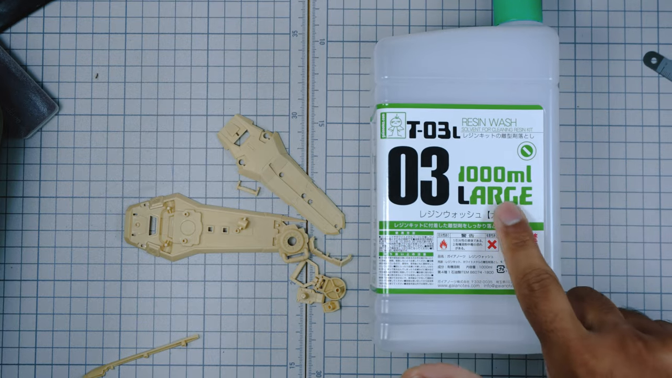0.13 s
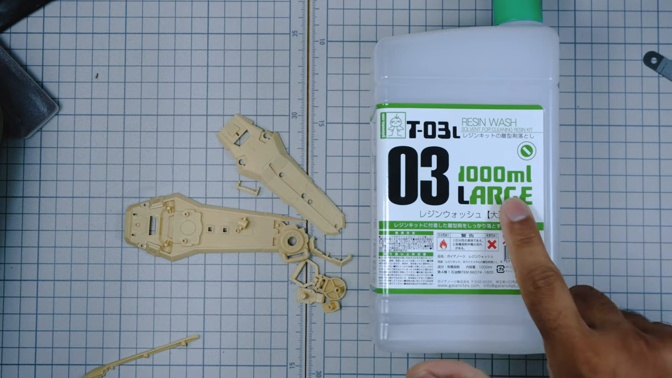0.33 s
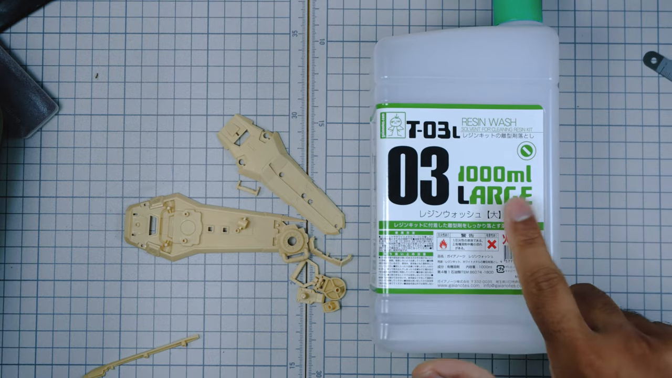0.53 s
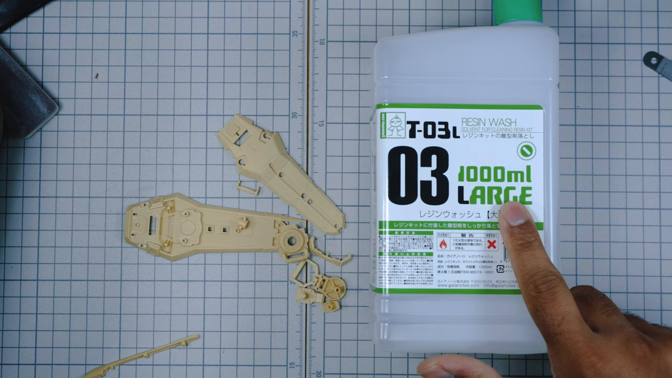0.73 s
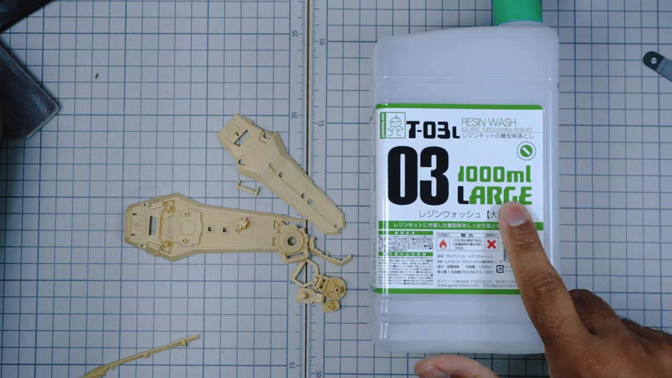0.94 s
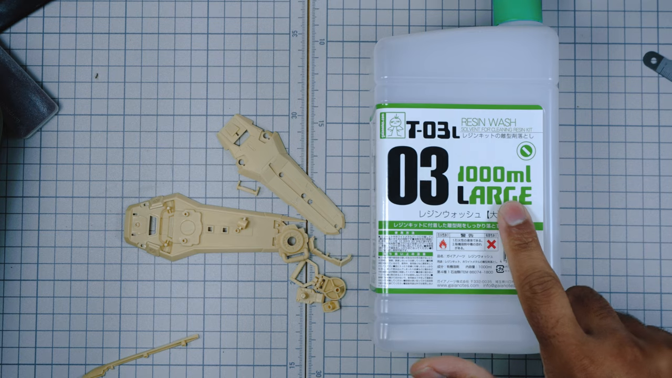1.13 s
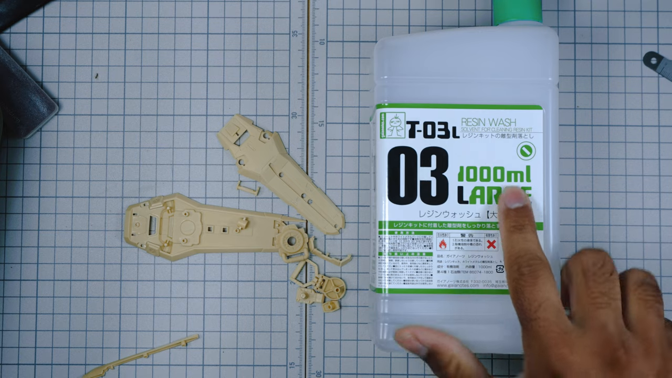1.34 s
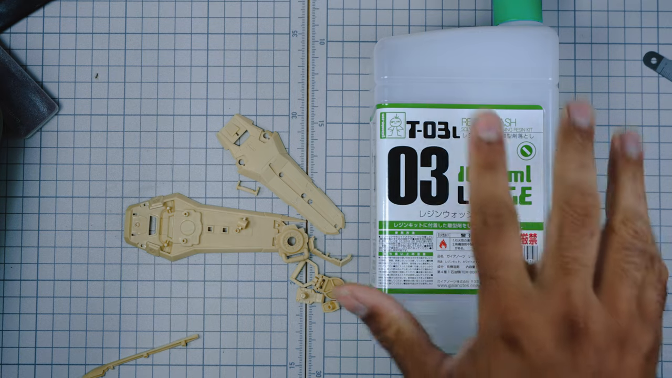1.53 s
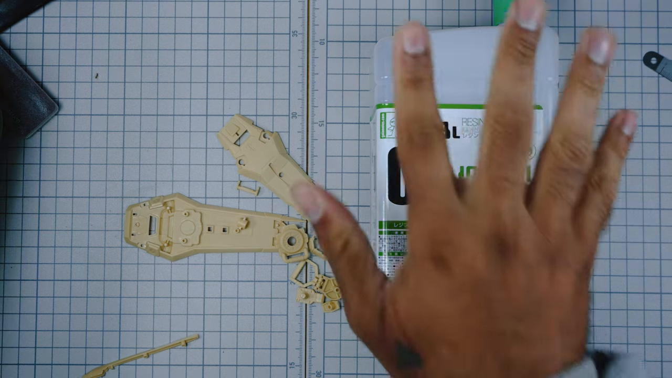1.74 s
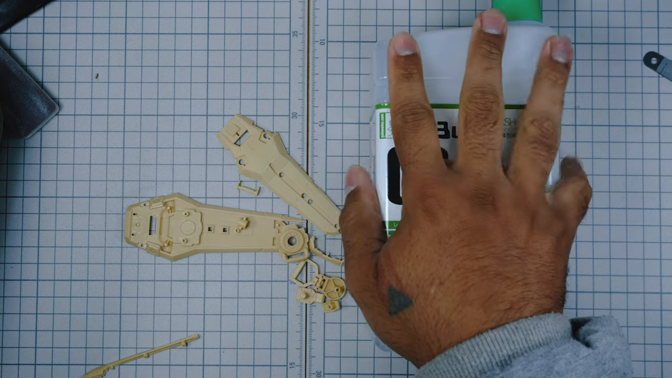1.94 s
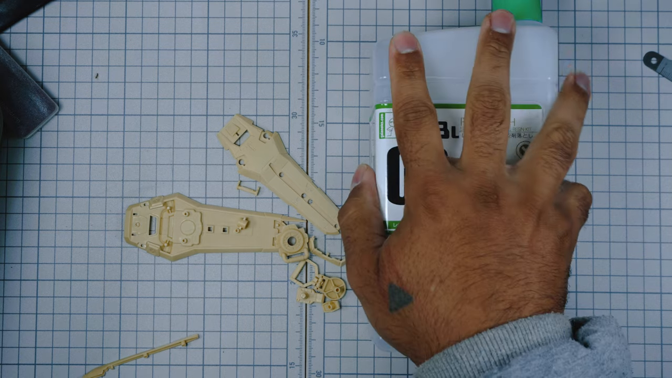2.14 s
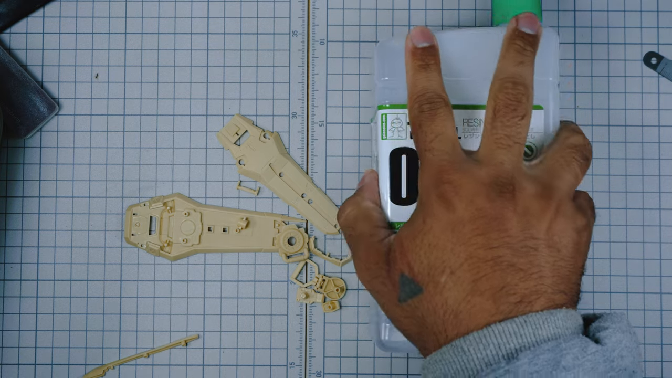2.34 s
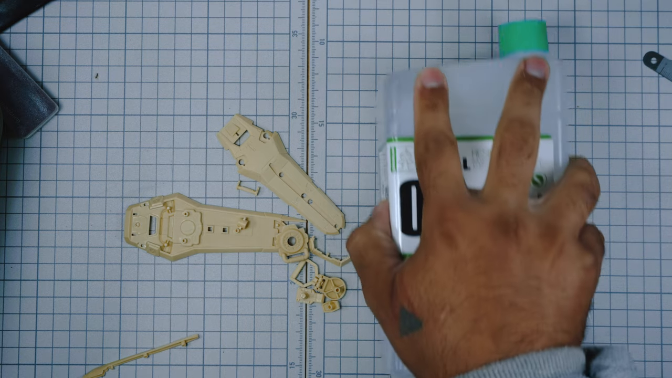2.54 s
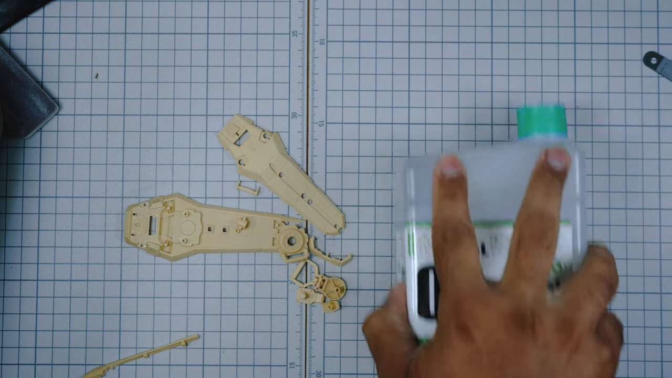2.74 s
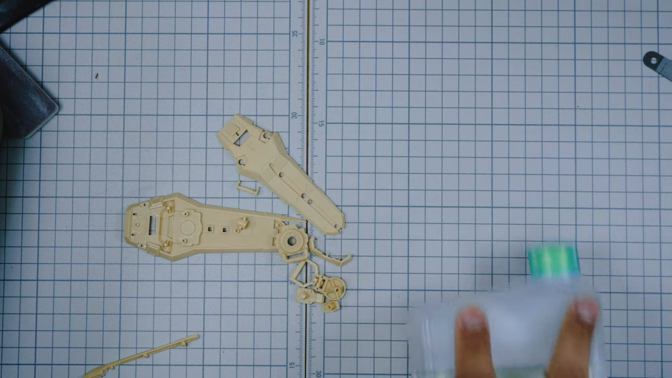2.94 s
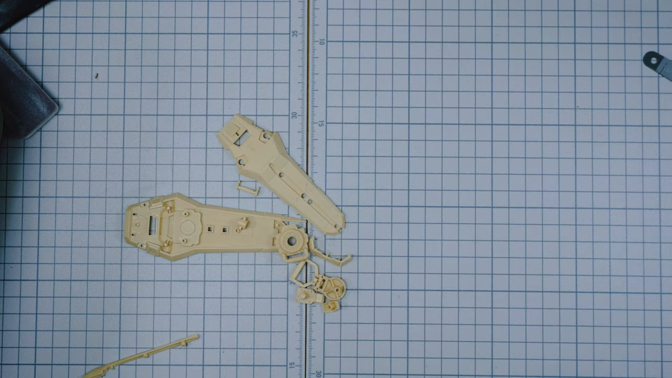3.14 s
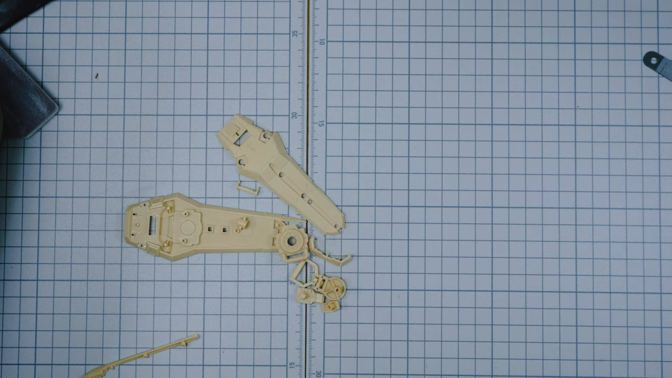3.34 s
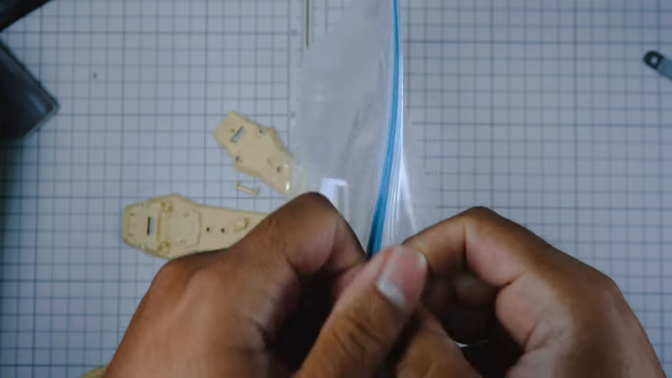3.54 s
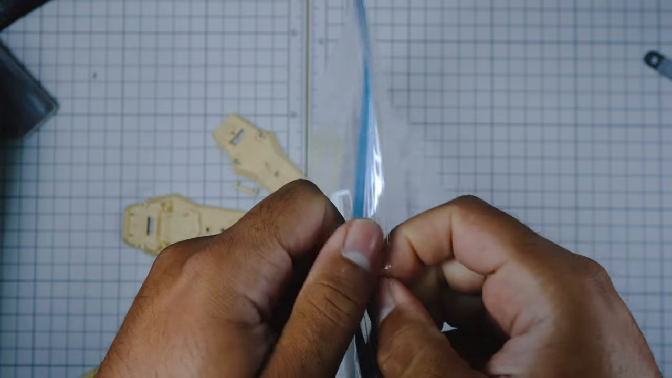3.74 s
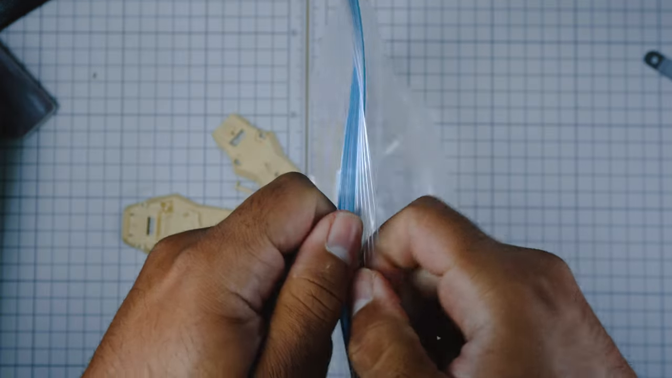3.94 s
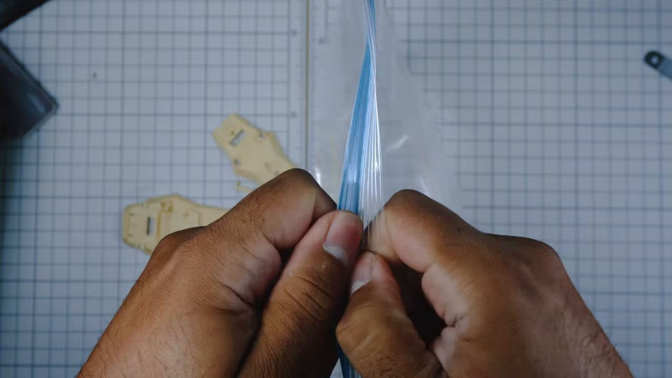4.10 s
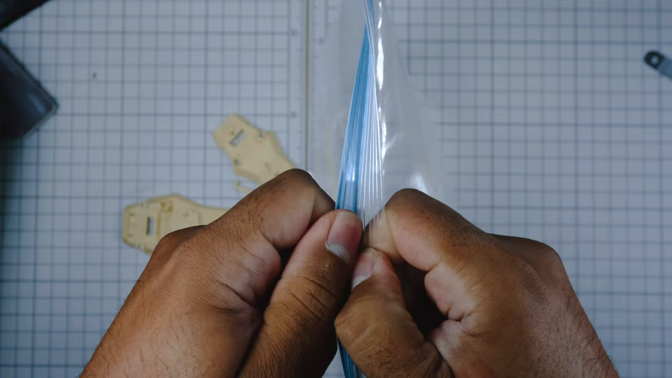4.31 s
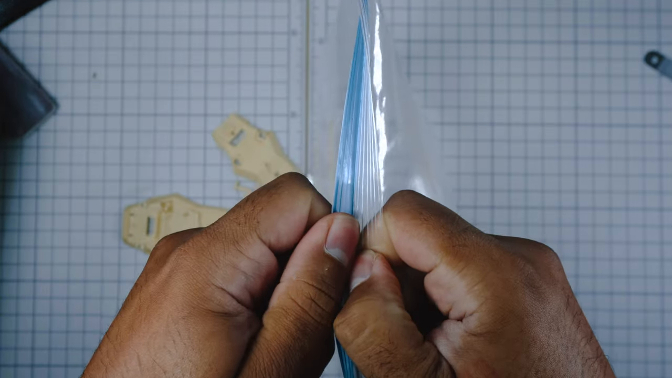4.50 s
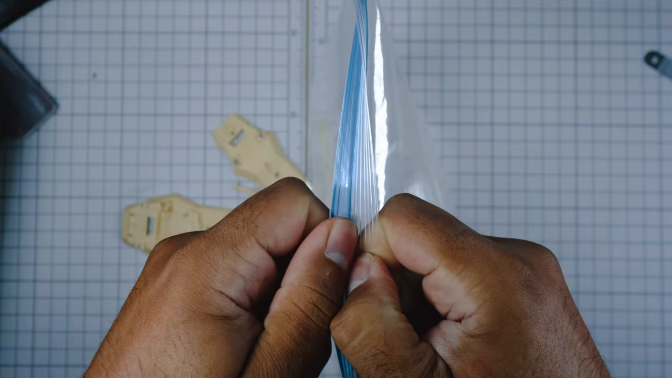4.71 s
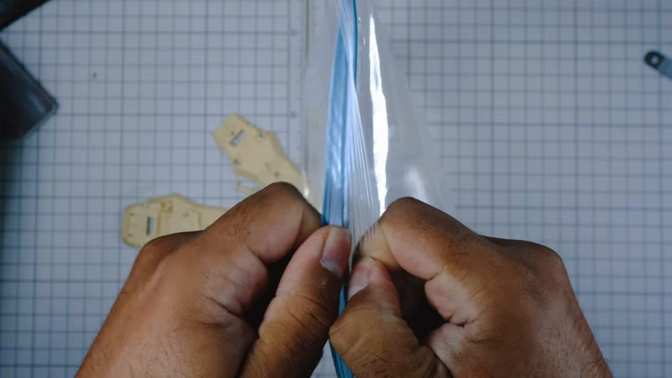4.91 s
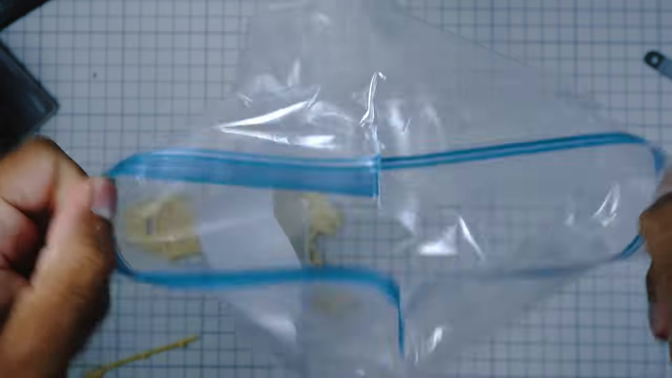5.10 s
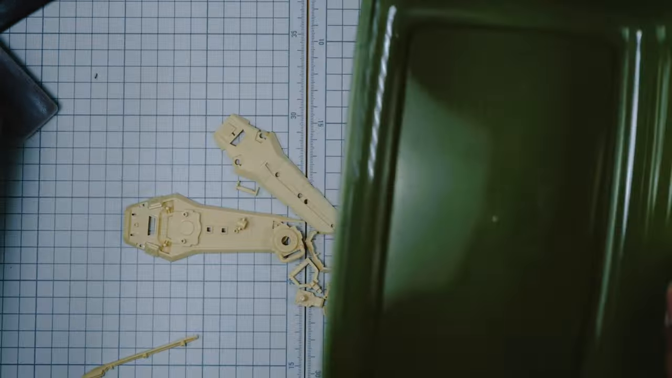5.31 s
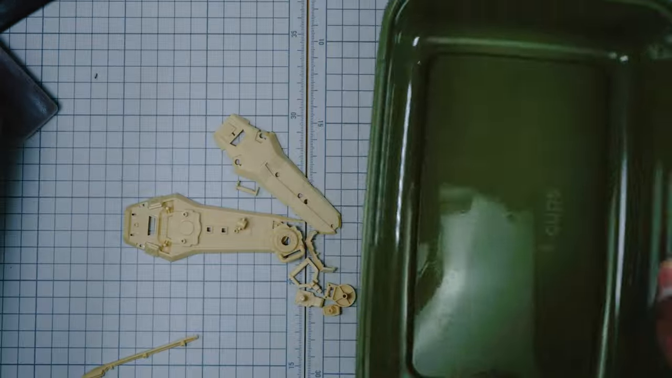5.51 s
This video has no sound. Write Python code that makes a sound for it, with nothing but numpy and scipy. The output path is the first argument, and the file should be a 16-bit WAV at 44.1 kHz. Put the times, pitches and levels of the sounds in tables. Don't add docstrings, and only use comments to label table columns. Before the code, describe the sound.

Four evenly spaced hard nail clicks on a filled bottle, a pause, then a meaty palm slap with soft skin rubbing. The bottle drags with a growing hollow scrape, skips and knocks off the edge. An abrupt cut brings light bag crinkling, near stillness, then a dense crackling rip with hollow pops, by far the loudest event. Quiet fan and low rumble underneath; close microphone indoors.

```python
import sys
import numpy as np
from scipy import signal
from scipy.io import wavfile
from scipy.ndimage import uniform_filter1d

SR = 44100
rng = np.random.default_rng(int(sys.argv[2]) if len(sys.argv) > 2 else 0)


def digitize_waveform(pressure):
    field = np.atleast_2d(pressure).T
    bounded = np.clip(field, -1, 1)
    quanta = np.round(bounded * 32767).astype(np.int16)
    wavfile.write(sys.argv[1], SR, quanta)


def how_loud(loudness_db):
    steps = np.asarray(loudness_db, float) / 20
    return 10 ** steps


N = 245195
T = np.arange(N) / SR


def evened(x):
    return x / np.sqrt(np.mean(x ** 2) + 1e-20)


def read(points, hz):
    f, value = np.transpose(points)
    return np.interp(np.log(hz + 1), np.log(f + 1), value)


def add(mix, s, sound):
    part = mix[round(s * SR):][:len(sound)]
    part += sound[:len(part)]


def resonate(x, hz, width):
    r = np.exp(-np.pi * width / SR)
    return 2 * signal.lfilter([1 - r], [1, -r * np.exp(2j * np.pi * hz / SR)], x).real


def ring(modes, spread_db):
    t = T[:SR // 2]
    out = np.zeros(len(t))
    for hz, db, t60 in modes:
        fall_db = db + spread_db * rng.standard_normal() - 60 * t / t60
        out += how_loud(fall_db) * np.sin(2 * np.pi * hz * t)
    return out


def burst(length, rise=1e-5):
    t = T[:3500]
    return rng.standard_normal(len(t)) * np.exp(-t / length) * (1 - np.exp(-(t + 1 / SR) / rise))


def snap(db, hz, fizz_db, length, width, click=0., rise=1e-5):
    kick = burst(length, rise)
    kick[0] += click
    body = resonate(kick, hz, width) + 0.14 * resonate(kick, 1600, 1100) + 0.16 * resonate(kick, 3500, 1700)
    top_hz = np.clip(2.4 * hz, 6000, 20000)
    body = signal.lfilter(*signal.butter(2, [600, top_hz], "bandpass", fs=SR), body)
    flash = burst(length, rise)
    flash[0] += click
    spark = resonate(resonate(flash, 11000, 9300), 11000, 9300)
    return how_loud(db) * (body / abs(body).max() + how_loud(fizz_db - 1.5) * spark / abs(spark).max())


def crinkle(db, hz, fizz_db, ms):
    return snap(db + 2.5, hz, fizz_db + 1.0, 0.00091 * ms, 470)


def crinkles(events):
    out = np.zeros(N)
    for s, *event in events:
        add(out, s, crinkle(*event))
    return out


def hollow_knocks(events):
    out = np.zeros(N)
    for s, db, hz, t60 in events:
        add(out, s, np.convolve(ring([(hz, db, t60)], 0), np.hanning(16) / 8))
    return out


def friction(rows, colour, centres_hz, grit_db, patch_db, size, rings=()):
    s, main_db, *others_db = np.transpose(rows)
    t = np.arange(s[0], s[-1], 1 / SR)
    grit = evened(uniform_filter1d(rng.standard_normal(len(t)), size=40))
    slips = rng.standard_normal(len(t)) * how_loud(grit_db * grit)
    slips = slips + sum(how_loud(db) * resonate(slips, hz, width) for hz, width, db in rings)
    hz, when, z = signal.stft(slips, SR, nperseg=512, noverlap=448)
    patches = uniform_filter1d(rng.standard_normal(z.shape), size[0], axis=0)
    patches = uniform_filter1d(patches, size[1], axis=1)
    z = z * how_loud(read(colour, hz)[:, None] + patch_db * evened(patches))
    out, order = 0, np.argsort(centres_hz)
    centres = np.log(np.array(centres_hz)[order])
    for k, db in enumerate([main_db] + [main_db + other for other in others_db]):
        share = np.interp(np.log(hz + 1), centres, order == k)
        band = signal.istft(z * share[:, None], SR, nperseg=512, noverlap=448)[1][:len(t)]
        out = out + evened(band) * how_loud(np.interp(t, s, db))
    return s[0], out * signal.windows.tukey(len(t), 0.0073 / (s[-1] - s[0]))


def stroke(curve, grip):
    return [(s, db, *grip) for s, db in curve]


def per_shot(levels_db):
    return how_loud(levels_db)[np.searchsorted([cut[0] for cut in CUTS], T)]


# time_s, turns_made
TURNS = [(.075, 1), (.807, 13), (1.226, 20), (1.712, 28), (3.437, 56.5), (4.284, 70), (4.891, 80),
         (5.308, 87), (5.61, 92)]


def fan_turns():
    return np.interp(T, *np.transpose([(-.535, -9)] + TURNS))


# time_s, sway_db
SWAY = [(0, -47), (.17, -44.5), (.34, -38), (.62, -36.5), (.96, -40), (1.21, -49), (1.52, -45),
        (1.84, -54.5), (2.21, -41.5), (2.38, -50.5), (2.66, -46), (2.97, -56.5), (3.22, -49.5),
        (3.5, -56.5), (4.33, -53.5), (4.63, -60.5), (5.31, -54.5), (5.56, -53)]


def fan_sway(turns):
    once = how_loud(np.interp(T, *np.transpose(SWAY)))
    twice = how_loud(-66.5) * np.sin(4 * np.pi * turns + 0.67)
    return np.sqrt(2) * (once * np.sin(2 * np.pi * turns + 4.3) + twice)


# pitch_hz, level_db (rms)
HUM = [(59.5, -59.5), (118.8, -66), (228, -70)]


def fan_hum():
    out = np.zeros(N)
    for hz, db in HUM:
        wobble = evened(resonate(rng.standard_normal(N), hz, 2.1))
        out += how_loud(db) * (np.sin(2 * np.pi * hz * T) + 0.55 * wobble)
    return np.sqrt(2) * out


TICK_DB = [-67.5, -76.5, -75]


def fan_ticks(turns):
    ticks = np.diff(np.floor(turns), prepend=0) * how_loud(1.9 * rng.standard_normal(N))
    return per_shot(TICK_DB) * signal.oaconvolve(ticks, np.diff(burst(0.0012)))[:N]


# pitch_hz, width_hz, level_db
WHINE = (6230, 300, -85.5)
WHINE_TRIM_DB = [0.5, -3, -6]


def fan_whine():
    hz, width, db = WHINE
    whine = resonate(resonate(rng.standard_normal(N), hz, width), hz, width)
    return per_shot(db + np.array(WHINE_TRIM_DB)) * evened(whine)


# pitch_hz, level_db (per Hz)
AIR = [(24, -10.5), (40, -0.5), (186, -15.5), (228, -14.5), (316, -15), (367, -27.5), (438, -28),
       (550, -35), (608, -31.5), (1580, -45), (5440, -52.5), (6330, -54.5), (7180, -58), (15300, -62),
       (16500, -65)]
RUMBLE_DB = [-56, -60.5, -59]


def fan_air():
    hz, t, z = signal.stft(rng.standard_normal(N), SR, nperseg=2048)
    z = z * how_loud(read(AIR, hz))[:, None]
    low = np.interp(hz, [300, 500], [1, 0])[:, None]
    hiss = signal.istft(z * (1 - low), SR, nperseg=2048)[1][:N]
    rumble = signal.istft(z * low, SR, nperseg=2048)[1][:N]
    return how_loud(-68) * evened(hiss) + how_loud(3.0) * per_shot(RUMBLE_DB) * evened(rumble)


def fan():
    turns = fan_turns()
    return fan_sway(turns) + fan_hum() + fan_ticks(turns) + fan_whine() + fan_air()


# pitch_hz, level_db, t60_s
TAP_MODES = [(75, -6.5, 0.19), (131, -9.5, 0.083), (197, -6.5, 0.056), (254, -6, 0.027), (425, -2.5, 0.067),
             (506, -16, 0.16), (572, -9, 0.0936), (750, -6.5, 0.049), (985, -12.5, 0.02),
             (1280, 0.5, 0.019), (1608, 0, 0.02), (1926, -1, 0.014), (2380, 11, 0.0043),
             (3400, -13, 0.0056), (4300, -2.5, 0.0065)]


def tap(db, desk_db):
    click = 0.11 * resonate(burst(0.005), 4900, 4200)
    click[:40] += 0.83 * np.diff(np.exp(-T[:40] / 0.000058), prepend=0)
    click += how_loud(-22.5) * resonate(resonate(burst(0.015), 1500, 2600), 1800, 2600)
    wall = np.convolve(ring(TAP_MODES[4:], 0.29), np.hanning(6) / 3)[:SR // 2]
    thump = ring(TAP_MODES[2:4], 0.6)
    add(thump, 0.0055, ring(TAP_MODES[:2], 0.67))
    desk = how_loud(desk_db) * np.convolve(thump, -np.hanning(70) / 32)[:SR // 2]
    sound = 0.37 * wall + desk
    add(sound, 0, click)
    return how_loud(db) * sound


# start_s, peak_db, desk_db (share of the thump)
TAPS = [
    (0.1324, -31.5, -5),
    (0.3185, -25.5, -5.5),
    (0.506, -26.5, -4),
    (0.6911, -26, -2),
    (1.245, -51, -24),
    (5.107, -43, 15),
]


def taps():
    out = np.zeros(N)
    for s, *blow in TAPS:
        add(out, s, tap(*blow))
    return out


# start_s, peak_db, pitch_hz, fizz_db (re ring), length_ms
BOUNCES = [
    (0.193, -53.5, 900, -20, 2),
    (0.193, -64, 3300, -14, 1.5),
    (0.38, -55.5, 2400, -16, 2),
    (0.56, -62, 2500, -22, 2.8),
]


def bounces():
    return crinkles(BOUNCES)


# time_s, brush_db
BRUSH = [
    [(.51, -82), (.555, -81), (.565, -76), (.6, -80), (.67, -88)],
    [(1.2, -98), (1.224, -82), (1.434, -68.5), (1.55, -84)],
    [(1.74, -80), (1.82, -65), (1.89, -60), (1.896, -64), (1.905, -53)],
    [(1.92, -55), (1.946, -56), (2.06, -75.5)],
    [(2.05, -77), (2.16, -73.5), (2.26, -68), (2.318, -77), (2.44, -74), (2.5, -74)],
]
# squeak_db, fizz_db (re brush)
BRUSH_GRIP = [(10.5, 4), (5.5, 2), (-1.5, -11), (1.5, -6), (11.5, -1)]
# pitch_hz, level_db (per Hz)
BRUSH_COLOUR = [(410, 20), (700, -38), (936, 6.5), (1530, 6.5), (1740, -1), (2100, -10.5), (3160, -9.5),
                (5800, -19), (11200, -29), (15400, -31), (16500, -26)]
# pitch_hz, width_hz, level_db (over the brush)
SQUEAK = [(1780, 140, 13)]


def brushes():
    out = np.zeros(N)
    for curve, grip in zip(BRUSH, BRUSH_GRIP):
        add(out, *friction(stroke(curve, grip), BRUSH_COLOUR, [3800, 1750, 10000], 1.0, 3.3,
                           size=(8, 12), rings=SQUEAK))
    return out


# pitch_hz, level_db, t60_s
SLAP_MODES = [(108.7, -10.5, 0.16), (157.3, -5.5, 0.31), (193, -14, 0.16), (242, -7.5, 0.13),
              (311, -9, 0.16), (463, -26, 0.06), (408, 2, 0.05), (513, -12, 0.12), (536, -27, 0.04),
              (714, -18.5, 0.1), (890, -20, 0.055), (1020, -15, 0.032), (1885, -7.5, 0.023)]


def slap(crack_db, body_db, length):
    boom = ring(SLAP_MODES[2:], 0.13)
    add(boom, 0.0061, ring(SLAP_MODES[:2], 0.13))
    sound = how_loud(body_db) * np.convolve(boom, -np.hanning(14) / 6)[:SR // 2]
    sound = signal.lfilter(*signal.butter(1, 70, "highpass", fs=SR), sound)
    skin = burst(length)
    crack = 0.16 * resonate(resonate(skin, 8900, 7000), 8900, 7000)
    crack += 1.3 * resonate(skin, 3100, 1400) + 0.99 * resonate(skin, 1800, 490)
    add(sound, 0, how_loud(crack_db) * crack)
    return sound


# start_s, crack_db, body_db, crack_length_s
SLAPS = [(1.9031, -33, -57, 0.0014), (1.9057, -21, -30, 0.00093), (1.9079, -36.5, -23, 0.0012),
         (1.9114, -18, -37, 0.0015), (1.9129, -49, -31, 0.002), (1.9174, -48, -31, 0.002),
         (1.9252, -55, -41.5, 0.002), (1.9367, -55, -37.5, 0.002), (2.531, -72, -45, 0.0025),
         (3.298, -60, -60, 0.0029), (0.0005, -53.5, -45, 0.0083)]


def slaps():
    out = np.zeros(N)
    for s, *blow in SLAPS:
        add(out, s, slap(*blow))
    return out


# pitch_hz, level_db, t60_s
SWING = [(27.9, -25.5, 0.53)]


def stand_swing():
    out = np.zeros(N)
    add(out, 1.954, -ring(SWING, 0) * np.minimum(T[:SR // 2] / 0.02, 1))
    return out


# time_s, scrape_db (speed), weight_db, hollow_db
DRAG = [
    [(2.44, -79.5, -77, -85), (2.562, -59, -49, -57), (2.69, -54, -47, -48.5), (2.8, -49, -46.5, -44),
     (2.9, -43, -47.5, -42), (3.0, -38, -47, -38), (3.05, -36.5, -49.5, -40), (3.067, -34.5, -50.5, -40.5),
     (3.1, -43, -52, -46)],
    [(3.09, -41.5, -52, -52), (3.146, -45, -52, -46), (3.162, -39.5, -57.5, -42.5), (3.215, -48, -51, -52),
     (3.232, -35.5, -53.5, -52), (3.276, -50.5, -77, -60), (3.29, -55, -53, -50)],
    [(3.29, -52, -48, -40.5), (3.34, -70.5, -76, -69), (3.405, -70, -84, -79)],
]
HOLLOW_SHIFT = [0.99, 0.83, 0.82]
# pitch_hz, width_hz, level_db (over the scrape)
DRAG_RINGS = [(1620, 140, 2.5), (2850, 560, -0.5)]
# pitch_hz, level_db (per Hz)
DRAG_COLOUR = [(120, -47), (200, -18), (329, -6.5), (451, 2), (829, -3), (892, -2.5), (1580, 2), (2210, -8),
               (2860, -7), (4060, -6), (5600, -9.5), (7200, -17.5), (14800, -28.5), (15600, -33),
               (16500, -65)]


def drag_levels(rows):
    s, *curves = np.transpose(rows)
    t = np.linspace(s[0], s[-1], num=100)
    db, weight_db, hollow_db = (np.interp(t, s, curve) for curve in curves)
    throb_db = 1 * np.cos(2 * np.pi * (t - 2.75) / 0.0625)
    fizz_db = -15.5 - 0.35 * np.maximum(db + 29.5, -18)
    return np.transpose([t, db, weight_db - db, hollow_db + throb_db - db, fizz_db])


def drags():
    out = np.zeros(N)
    for rows, shift in zip(DRAG, HOLLOW_SHIFT):
        rings = [(hz * shift, width, db) for hz, width, db in DRAG_RINGS]
        add(out, *friction(drag_levels(rows), DRAG_COLOUR, [3600, 640, 1620, 9700], 1.47, 1.82,
                           size=(5, 36), rings=rings))
    return out


# start_s, level_db, pitch_hz, t60_s
GLUGS = [
    (2.967, -34.5, 530, .059),
    (2.981, -31.5, 660, 0.051),
    (3.2897, -41, 1340, .03),
    (3.2919, -31, 1340, 0.019),
    (3.2965, -31.5, 1630, 0.015),
    (3.296, -42, 398, 0.071),
    (3.305, -50, 566, 0.051),
]


def glugs():
    return hollow_knocks(GLUGS)


# start_s, peak_db, pitch_hz, fizz_db, length_ms
DROP = [(3.2895, -42, 3000, -17, 1.1), (3.2956, -37.5, 5060, -8, 0.6), (3.327, -53.5, 9400, -3, 1.3),
        (3.341, -70, 9000, 6, 1), (3.367, -70, 9000, 6, 1), (3.3891, -63, 8250, -3, 1),
        (5.1829, -26.5, 4200, -16, 0.56), (5.1831, -31, 6200, -14, 0.5), (5.192, -32.5, 5400, -12, 1.2),
        (5.1922, -29.5, 2600, -11, 1.6), (5.222, -48, 1090, -23, 7)]


def edge_drop():
    return crinkles(DROP)


# time_s, rustle_db
RUSTLE = [
    [(3.41, -87), (3.61, -64), (3.83, -56.5), (3.88, -67), (3.964, -55.5), (4.11, -71), (4.336, -96),
     (4.366, -76), (4.59, -100)],
    [(4.59, -82), (4.71, -70), (4.87, -68), (4.9, -79), (4.948, -73)],
    [(5.245, -74), (5.319, -67), (5.56, -94)],
]
# flex_db (low flex), fizz_db (both re rustle)
RUSTLE_GRIP = [(0.5, -9), (-19, -14), (-8, -14)]
# pitch_hz, level_db (per Hz)
RUSTLE_COLOUR = [(240, -16), (400, 8), (475, -28), (521, -10), (1050, -8.5), (4830, -12), (6290, -12.5),
                 (14600, -23), (15700, -41), (16500, -42)]


def rustles():
    out = np.zeros(N)
    for curve, grip in zip(RUSTLE, RUSTLE_GRIP):
        s, film = friction(stroke(curve, grip), RUSTLE_COLOUR, [4200, 1500, 10000], 2.0, 3.7,
                           size=(70, 4), rings=[(3400, 570, 0.98), (5130, 380, 4.1)])
        add(out, s, how_loud(-5.0) * film)
    return out


# start_s, peak_db, pitch_hz, length_ms
CRINKLES = [(3.4965, -52, 1370, 6.4), (3.504, -50, 1300, 3.3), (3.569, -56, 1340, 3.4),
            (3.611, -56, 1790, 1.2), (3.615, -49, 1190, 12), (3.623, -50, 1880, 5),
            (3.706, -44.5, 1350, 3.5), (3.714, -47.5, 1280, 8.4), (3.7356, -59, 5200, 13),
            (3.775, -53, 2860, 30), (3.7864, -46, 4540, 4.5), (3.8062, -39.5, 3600, 0.64),
            (3.8141, -43, 2690, 4.6), (3.823, -41, 2850, 1.1), (3.8863, -45.5, 4400, 4.9),
            (3.9402, -47, 2940, 13), (3.992, -44, 3830, 2.5), (4.0077, -42.5, 3080, 3.3),
            (4.029, -46, 2600, 2.9), (4.074, -44.5, 4340, 14), (4.0907, -44.5, 2880, 3.7),
            (4.0917, -46, 5200, 2), (4.128, -46, 2960, 3), (4.222, -58, 2990, 4.2), (4.303, -63, 1300, 3),
            (4.3522, -46.5, 1500, 1.6), (4.3555, -59, 3200, 2.5), (4.37, -46, 3040, 2.4),
            (4.372, -48.5, 1200, 3.6), (4.422, -51.5, 3220, 3.4), (4.5728, -49, 1730, 4.3),
            (4.632, -58, 1810, 3.8), (4.665, -53.5, 1680, 3), (4.9527, -51, 1420, 6.9)]
# start_s, peak_db, pitch_hz, fizz_db (re ring)
FAINT = [(3.4905, -57, 3360, -16), (3.5512, -50, 1140, -22), (3.596, -45, 1010, -20),
         (3.6033, -47, 1010, -14), (3.6297, -51, 1870, -17), (3.6505, -53, 3620, -1),
         (3.699, -55, 1440, -11), (3.719, -42, 4570, -8), (3.725, -51, 1010, -16), (3.7295, -48, 5000, -16),
         (3.7403, -50, 1810, -15), (3.7521, -52, 3680, -12), (3.756, -52, 4220, -16),
         (3.767, -57, 1010, -18), (3.791, -44, 2430, -9), (3.802, -44, 3380, -14), (3.81, -41, 3550, -8),
         (3.826, -55, 1720, -14), (3.847, -45, 2950, -19), (3.8582, -50, 2670, -15),
         (3.8953, -55, 4760, -15), (3.9334, -46, 2650, -3), (3.953, -39, 1270, -16),
         (3.9577, -40, 1310, -16), (3.964, -47, 1230, -10), (3.9792, -54, 1010, -13),
         (3.985, -40.5, 1020, -7), (4.0024, -50, 3950, -16), (4.036, -40.5, 1010, -26),
         (4.069, -54, 4200, -20), (4.0846, -44, 1270, -17), (4.0964, -50, 4390, -18),
         (4.102, -44, 1380, -18), (4.108, -53, 2330, -21), (4.1157, -54, 4410, -13),
         (4.1909, -52, 3140, -12)]


def folds():
    out = np.zeros(N)
    for s, db, hz, ms in CRINKLES:
        fizz_db = max(-4 - 49 * abs(s - 3.74), -30)
        add(out, s, crinkle(db, hz, fizz_db, ms))
    for s, db, hz, fizz_db in FAINT:
        add(out, s, crinkle(db - 4, hz, fizz_db, 2.4))
    return out


# time_s, brush_db
THUMB = [
    [(4.17, -75), (4.21, -71), (4.25, -83)],
    [(4.39, -75), (4.44, -72.5), (4.47, -79)],
    [(4.61, -71), (4.65, -71), (4.69, -82)],
]
# flex_db (low flex), fizz_db (both re sweep)
THUMB_GRIP = (-19, -13)


def thumb_sweeps():
    out = np.zeros(N)
    for curve in THUMB:
        add(out, *friction(stroke(curve, THUMB_GRIP), RUSTLE_COLOUR, [4200, 1500, 10000], 1.1, 2.0,
                           size=(30, 6)))
    return out


# time_s, tear_db
TEAR = [(4.964, -72.5), (4.975, -36.5), (5.0, -25), (5.07, -31), (5.1, -33.5), (5.115, -34.5),
        (5.136, -39.5), (5.165, -48), (5.24, -66.5)]
# pitch_hz, level_db (per Hz)
TEAR_COLOUR = [(50, -28), (100, -12), (300, 4), (900, -4), (3000, -6), (5000, -8.5), (9000, -18.5),
               (15500, -22), (16500, -37)]


def tear():
    rows = []
    for s, db in TEAR:
        air_db = -11.5 + 12 * np.exp(-((s - 5.125) / 0.037) ** 2)
        rows.append((s, db, air_db, -10))
    out = np.zeros(N)
    add(out, *friction(rows, TEAR_COLOUR, [3200, 400, 10000], 4.0, 2.3, size=(40, 2)))
    return out


# start_s, peak_db, pitch_hz, spark_db
SNAPS = [(4.9679, -13, 4650, -20), (4.969, -13, 6740, -19), (4.9748, -8.5, 4610, -21),
         (4.9776, -11, 3970, -7), (4.979, -5, 2650, -18), (4.985, -11, 1537, -18.5),
         (4.987, -2.5, 4600, -14), (4.9891, -16, 4430, -28.5), (4.9949, -3, 3760, -17),
         (4.9963, -4.5, 3100, -17), (4.998, -11, 3290, -18.5), (5.0013, -12, 3600, -15),
         (5.001, -10, 3200, -21.5), (5.0044, -5.5, 3050, -15), (5.008, -12.5, 3060, -18),
         (5.0121, -5.5, 3040, -15.5), (5.014, -12, 3730, -17.5), (5.017, -6, 2640, -14),
         (5.018, -8, 2330, -18.5), (5.02, -10.5, 2480, -18.5), (5.023, -18, 2950, -19),
         (5.031, -14.5, 3230, -24), (5.033, -9, 2410, -17.5), (5.0352, -6.5, 4040, -17.5),
         (5.0359, -9, 2570, -21.5), (5.0394, -11, 2540, -19), (5.0466, -9.5, 4230, -15.5),
         (5.0478, -17, 1607, -22.5), (5.0572, -9.5, 4250, -19.5), (5.0591, -9.5, 2977, -21),
         (5.0624, -5, 4550, -10.5), (5.0643, -15.5, 2650, -18.5), (5.0678, -11, 3080, -17.5),
         (5.0695, -10, 2910, -17.5), (5.072, -9.5, 6070, -14.5), (5.072, -11.5, 4410, -18),
         (5.0778, -16, 3770, -15), (5.08, -10, 3890, -14.5), (5.0816, -17.5, 1100, -19.5),
         (5.091, -9.5, 3400, -12.5), (5.1, -9.5, 3790, -13.5), (5.1029, -13.5, 3115, -25),
         (5.112, -12.5, 2900, -18), (5.1135, -14, 3440, -17), (5.1164, -14, 1854, -21),
         (5.1196, -14.5, 2670, -22), (5.1204, -13, 1015, -24), (5.1258, -14.5, 3600, -18.5),
         (5.1375, -20.5, 5170, -28.5), (5.1394, -24.5, 2510, -32)]


def teeth():
    out = np.zeros(N)
    for s, db, hz, spark_db in SNAPS:
        smear = np.clip((s - 5.015) / 0.1, 0, 1)
        fizz_db = spark_db + 6 - 3 * smear - db
        length = 0.00032 + 0.0013 * smear
        click = 4.5 - 3.5 * np.sqrt(smear)
        add(out, s, snap(db, hz, fizz_db, length, 800, click=click, rise=1e-5 + 0.0005 * smear))
    return out


# start_s, level_db, pitch_hz, t60_s
POPS = [
    (5.094, -25.5, 930, .03),
    (5.112, -24.5, 900, .035),
    (5.116, -27.5, 720, .03),
    (5.108, -30.5, 265, 0.072),
    (5.179, -45, 1000, .03),
]


def pops():
    return hollow_knocks(POPS)


# time_s, scuff_db
TRAY = [(5.245, -73), (5.3, -67), (5.33, -70), (5.42, -63.5), (5.56, -71)]


def tray():
    out = np.zeros(N)
    add(out, *friction(stroke(TRAY, [-22]), TEAR_COLOUR, [520, 1100], 1.2, 2.1, size=(3, 20)))
    return out


# pitch_hz, t60_s
ROOM = [(100, 0.32), (1000, 0.17), (4000, 0.12), (12000, 0.11)]


def room(x):
    out, at = 0, np.arange(120, SR // 2 - 20, 20)
    for k in range(3):
        echoes = np.zeros(SR // 2)
        echoes[at + rng.integers(0, 20, len(at))] = rng.choice([-1., 1.], len(at))
        hz, t, z = signal.stft(echoes, SR, nperseg=256)
        tail = signal.istft(z * how_loud(-60 * t / read(ROOM, hz)[:, None]), SR, nperseg=256)[1]
        turn = np.sqrt((1 + np.cos(2 * np.pi * (T / .56 - k / 3))) / 3)
        out = out + signal.oaconvolve(x * turn, tail / np.linalg.norm(tail))[:N]
    return out * (T < CUTS[1][0])


def scene():
    bottle_hits = taps() + bounces() + slaps() + glugs() + edge_drop()
    bag_hits = folds() + teeth() + pops()
    hits = bottle_hits + bag_hits
    bottle_rubs = brushes() + stand_swing() + drags()
    bag_rubs = rustles() + thumb_sweeps() + tear() + tray()
    return (hits + how_loud(-12.5) * room(hits) + bottle_rubs + bag_rubs + fan())[None]


def band_limit(x):
    return signal.sosfilt(signal.butter(12, 16660, fs=SR, output="sos"), x)


# time_s, fade_in_s, dip_db
CUTS = [
    (3.407, 0.0099, -21),
    (5.241, 0.0044, 2),
]


def record(dry):
    dip_db = sum(db * np.exp(-abs(T - s) / np.where(T < s, .0008, fade)) for s, fade, db in CUTS)
    limit = 0.8
    loud = limit * np.tanh(dry / limit) * how_loud(dip_db)
    edge = signal.firwin(255, 16000, window=("kaiser", 7), fs=SR)
    return band_limit(signal.oaconvolve(loud, edge[None], "same"))


dry = scene()
out = record(dry)
digitize_waveform(out)
```